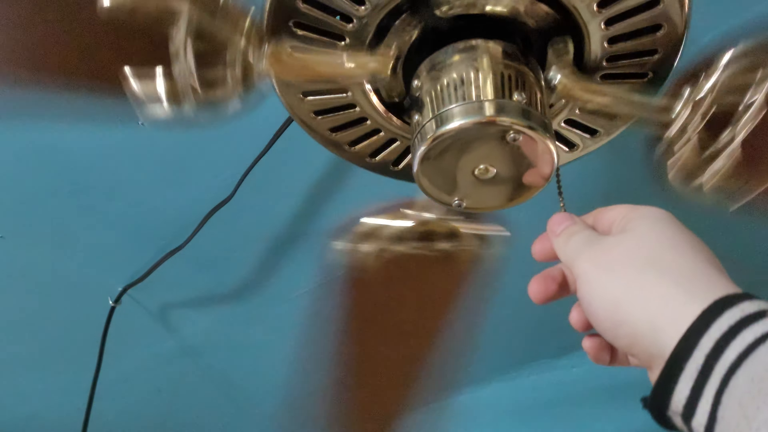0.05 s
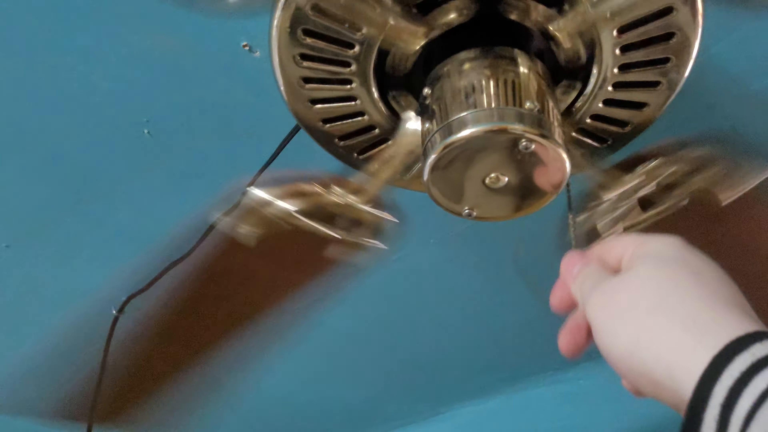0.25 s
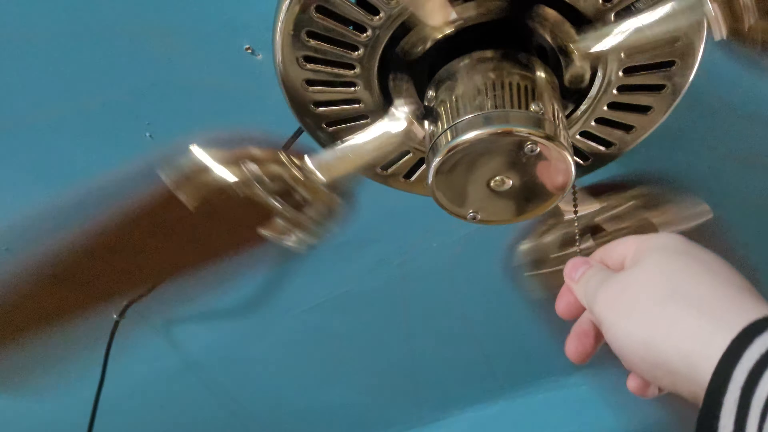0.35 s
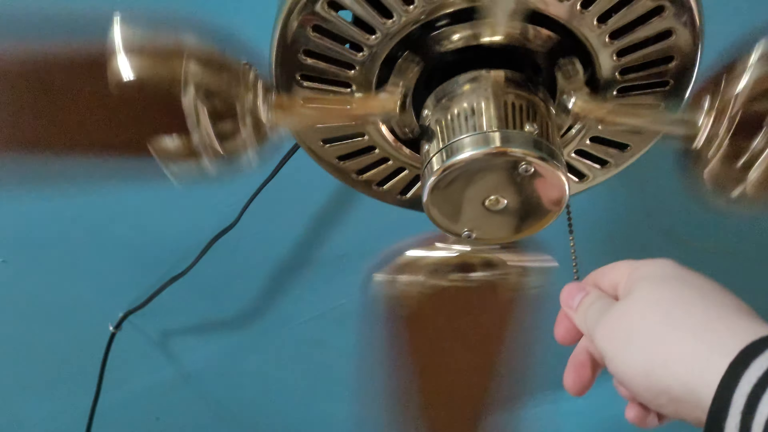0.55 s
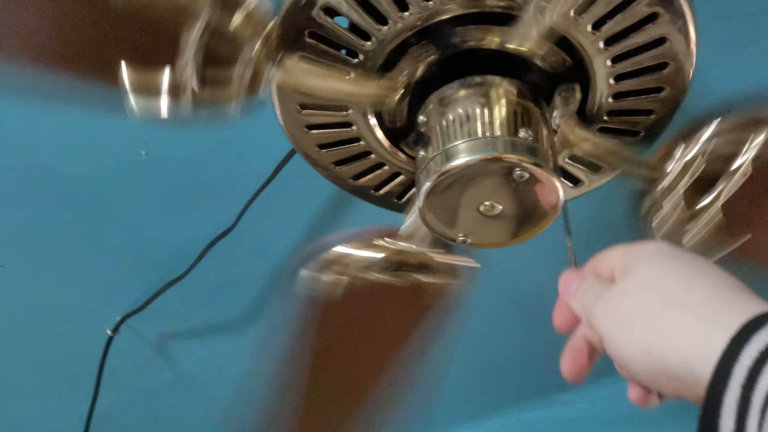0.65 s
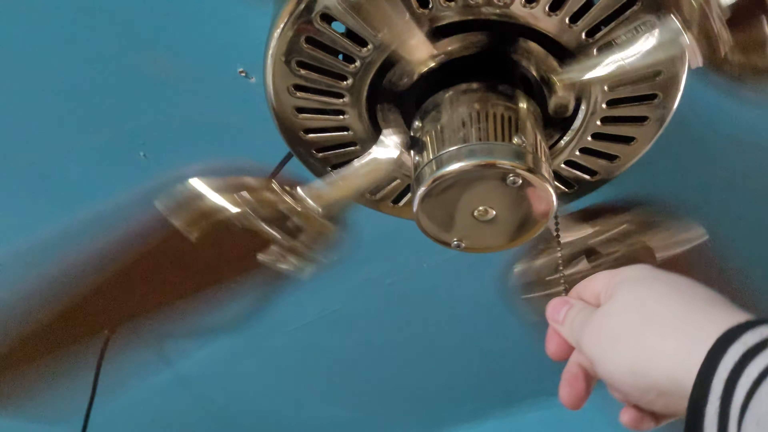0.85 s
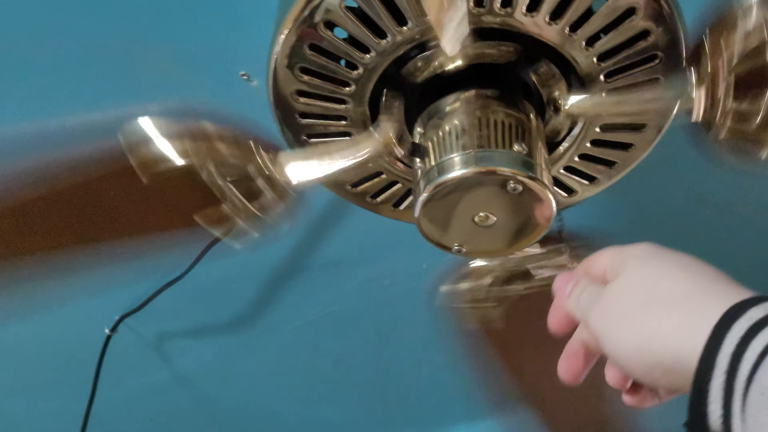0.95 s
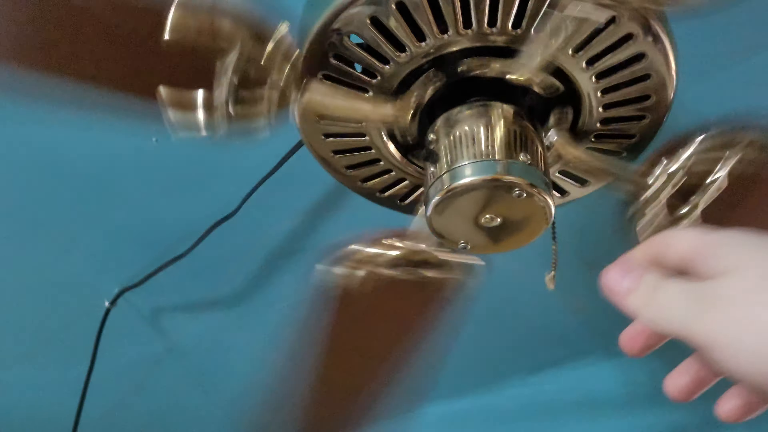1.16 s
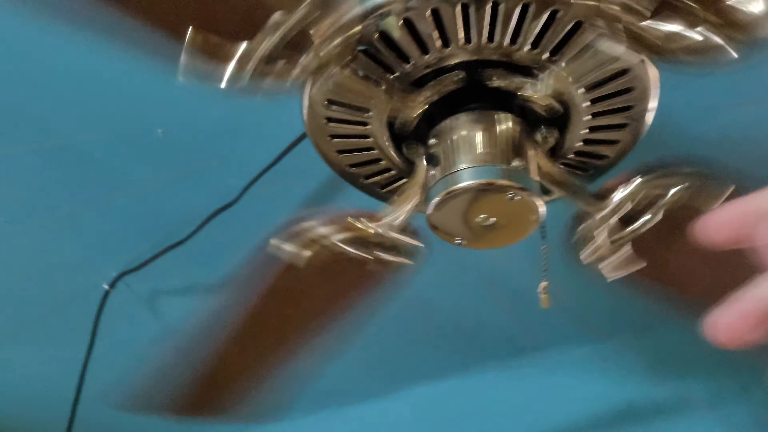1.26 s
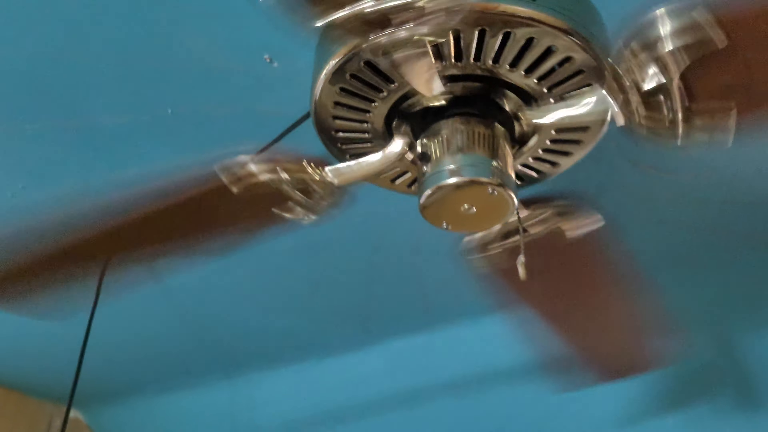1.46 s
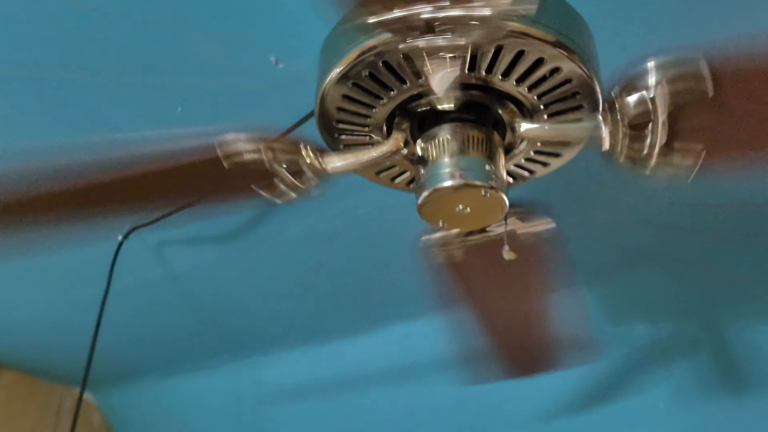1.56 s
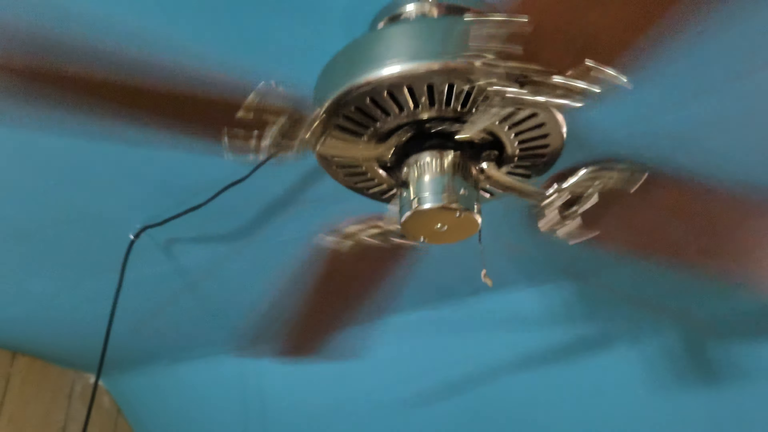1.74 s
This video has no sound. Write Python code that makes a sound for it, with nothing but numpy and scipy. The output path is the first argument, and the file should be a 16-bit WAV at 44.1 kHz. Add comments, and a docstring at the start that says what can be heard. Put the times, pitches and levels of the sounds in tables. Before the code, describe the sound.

A ceiling fan's bead chain is tugged six times quickly, each a sharp metallic click with a tiny rattle. Then the draught briefly buffets the close microphone, over a faint air hum in a small room.

```python
"""A ceiling fan runs in a small room: air hums faintly and the draught buffets a close microphone.
From 0.25 s to 1 s a hand tugs the bead chain six times. On each tug a few beads tick over the rim of
the switch housing, then the switch snaps, the chain rattles and the housing rings in its normal modes.
Near 1.2 s the draught peaks and single eddies strike the microphone. At 1.5 s the hand leaves the
chain with a soft rub, and a faint whirr grows until the end."""
import sys
import numpy as np
from scipy import signal
from scipy.fft import rfft, irfft
from scipy.io import wavfile
from scipy.ndimage import uniform_filter1d

SR = 44100
rng = np.random.default_rng(int(sys.argv[2]) if len(sys.argv) > 2 else 0)


def to_wav(sig):
    """Store sig (one row per channel, or 1-D mono) as 16-bit WAV at the path in sys.argv[1].

    Samples outside -1..1 are clipped; the rate is SR.
    """
    pcm = np.clip(np.atleast_2d(sig), -1, 1) * 32767
    pcm = np.round(pcm).astype(np.int16)
    wavfile.write(sys.argv[1], SR, pcm.T)  # frames by channels


N = 79380
T = np.arange(N) / SR
FREQS = np.fft.rfftfreq(N, 1 / SR)
CONTACT_RISE_S = 0.00075

# Snaps of the switch: t/s, level/dB, treble/dB, left-right/dB, housing ring/dB, low modes/dB,
# rattle/dB, rattle decay/s
SWITCH_SNAPS = [(0.319,-9,3,3.5,3.5,3.5,0,0.0091),(.4780,-1,-27,-0.5,1.5,-9,3,0.0036),(.5850,-5,1.5,-0.5,4,2.5,4.5,0.016),
                (0.737,-3.5,-3,-2,-2,2,2,0.026),(0.851,-3,-8,2.5,3.5,3,3.5,0.015),(1.0139,-3.5,-14,-0.5,3,-5.5,1.5,0.015)]


def pull_switch():
    """Superposition: the direct sound of switch and chain adds to the echoes of ticks and snaps."""
    ticks, snaps = bead_ticks(), switch_snaps()
    reflections = room(undb(-0.5) * ticks + undb(-4.5) * snaps)
    return ticks + snaps + rattle() + clinks() + housing() + reflections


def switch_snaps():
    """Impulsive excitation: the switch snaps over, and so brief a force has a broad spectrum."""
    spectrum = [(150, -35), (250, -15), (651, -22.5), (748, -21.5), (1200, -6), (1550, -24), (1950, -5.5),
                (2440, -16.5), (3120, -9), (6250, -18.5), (7840, -11.5), (9660, -23.5), (16000, -14)]  # f/Hz, level/dB
    return undb(-16.5) * impacts(SWITCH_SNAPS, spectrum, decay_s=0.0028, likeness=0.47)


def bead_ticks():
    """Impact sound: beads strike the rim of the housing one by one."""
    strikes = [(.2535,-19,-6.5,6),(.2885,-7,-13,5.5),(.3072,2,-13,-1),(.4342,-3,-9.5,-0.5),(.4560,-1.5,-8,-4),(.4728,-3.5,-1.5,3),
               (.5497,-9,-9,4),(.5668,-0.5,-17,1),(.5772,3.5,-6.5,-0.5),(.7008,-2,-12,-4.5),(.7200,-1,-4.5,4),(.7347,0,-3,-4),
               (.8228,-2,-9,1.5),(.8350,-3.5,-9,5),(.8428,4.5,-3.5,1),(.8560,-1,-10,-2),(.9770,-1,-9.5,-5.5),(.9960,2.5,-7,0.5),(1.0110,-3,3.5,-4.5)]  # t/s, level/dB, treble/dB, left-right/dB
    spectrum = [(400,0),(800,-1.5),(1200,0),(2000,-4.5),(3000,-8),(4400,-7),(5500,-7.5),(6300,-12.5),(7100,-1.5),(8600,-15),(10200,-14.5),(12000,-9.5),(14400,8.5),(16000,-2)]  # f/Hz, level/dB
    return undb(-24.5) * impacts(strikes, spectrum, decay_s=0.0035, likeness=0.13)


def impacts(strikes, spectrum, decay_s, likeness):
    """Transients of metal contact: the bright crack peaks first, the lower body just after."""
    body_hz, treble_hz = 1426, 10240
    body = split(noise(0.93), body_hz)[0]
    bright = split(noise(likeness), body_hz)[1]
    mid, treble = split(bright, treble_hz)
    out = 0
    for start, db, treble_db, pan_db, *_ in strikes:
        crack = (mid + undb(treble_db) * treble) * burst(start, CONTACT_RISE_S, decay_s)
        knock = body * burst(start, 0.0014, decay_s)
        out = out + undb(db) * pan(pan_db) * (crack + knock)
    return colour(out, spectrum)


def housing():
    """Free vibration: each snap rings the damped normal modes of the housing, never twice alike."""
    normal_modes = [(145.4,-7.5,0.25),(305.8,1,0.2),(385.6,-10.5,0.4),(476,-3.5,0.13),(628.3,-0.5,0.12),(854,-8.5,0.15),(1048,-3,0.091),(1133,-4,0.092),(1202,-1.5,0.095),
                    (1936,-8.5,0.2),(2116,-29,0.181),(2950,-12,0.21),(4540,4.5,0.029),(5770,0.5,0.027)]  # f/Hz, level/dB, T60/s
    hz, db, t60 = np.array(normal_modes).T[:, :, None]
    low_modes_hz, rise_s = 350, 0.0027
    age = T[:SR // 3]
    envelope = np.minimum(age / rise_s, 1) * np.exp(-np.log(1000) * age / t60)
    out = np.zeros(N)
    for start, snap_db, _, _, ring_db, low_db, *_ in SWITCH_SNAPS:
        scatter_db, phase, detune = rng.standard_normal((3, len(normal_modes), 1))
        amplitude = undb(db + scatter_db + low_db * (hz < low_modes_hz))
        modes = amplitude * np.sin(2 * np.pi * (hz * (1 + 0.0047 * detune) * age + phase))
        i = int(start * SR)
        out[i:i + len(age)] += undb(-35 + snap_db + ring_db) * (modes * envelope).sum(0)
    return out


def clinks():
    """Damped oscillators: each clink, set off by a snap or a bead strike, is one short-lived mode."""
    modes = [(.3072,5470,-16),(0.321,5520,-4.5),(0.479,2273,-2),(0.738,4470,-2.5),(0.739,5490,0),(1.0143,3000,-3),(1.0147,7810,-2.5)]  # t/s, f/Hz, level/dB
    t60_s = 0.022
    phases = rng.random((len(modes), 2, 1))
    out = 0
    for (start, hz, db), phase in zip(modes, phases):
        envelope = burst(start, CONTACT_RISE_S, t60_s / np.log(1000))
        out = out + undb(db - 21) * np.sin(2 * np.pi * (hz * T + phase)) * envelope
    return out


def rattle():
    """Shot noise of colliding beads: the chain slips just before each snap and shakes on after it."""
    spectrum = [(250,6),(700,-0.5),(1200,8),(2800,2),(4600,3.5),(6200,-22),(7600,-19),(10000,-30),(15000,-7)]  # f/Hz, level/dB
    contacts_per_s, spread_db, lead_s = 2400, 2.5, 0.006
    contacts = (rng.random(N) < contacts_per_s / SR) * undb(spread_db * rng.exponential(size=N))
    grit = unit(uniform_filter1d(contacts, size=24)) * diffuse()
    shake = sum(undb(db) * burst(start - lead_s, 2 * lead_s, decay)
                for start, *_, db, decay in SWITCH_SNAPS)
    return undb(-37.5) * colour(grit * shake, spectrum)


def room(x):
    """Reverberation: convolution with the dense reflections of a small room, whose treble dies first."""
    decay_times = [(250,0.3),(1000,0.35),(4000,0.29),(8000,0.21),(14000,0.14)]  # f/Hz, T60/s
    rest = diffuse()
    response = 0
    for hz, t60 in decay_times:
        band, rest = split(rest, hz * np.sqrt(2))
        fade = burst(start=0.0008, attack=0.00098, decay=t60 / np.log(1000))
        response = response + band * fade / np.sqrt(np.sum(fade ** 2))
    return signal.fftconvolve(x, response, axes=1)[:, :N]


def rubs():
    """Friction noise: the hand shifts and leaves the chain; a hollow resonance follows each rub."""
    strokes = [(.925,-38.5,0.015,0.025,-6),(0.955,-46,0.01,0.058,-3.5),(1.509,-54,0.0097,0.058,3),(1.528,-47.5,0.004,0.054,2.5)]  # t/s, level/dB, attack/s, decay/s, resonance/dB
    spectrum = [(150,3),(300,6),(700,-3.5),(1500,-8.5),(4000,-17.5),(7000,-24),(10000,-38.5),(16000,-47)]  # f/Hz, level/dB
    lag_s = 0.0067
    swell = hollow = 0
    for start, db, attack, decay, hollow_db in strokes:
        swell = swell + undb(db) * burst(start, attack, decay)
        hollow = hollow + undb(db + hollow_db) * burst(start, attack + lag_s, decay)
    return colour(diffuse(), spectrum) * swell + resonance(hz=293, width_hz=57) * hollow


def draught():
    """Turbulent pressure: gusts from the blades rumble on the microphone ports, mostly the right one."""
    course = [(0,-45.5,-17),(.08,-58.5,15),(0.199,-40,6.5),(0.292,-35.5,-23),(.35,-38,9),(.4,-39.5,-23),(.48,-46.5,-14.5),(.54,-58.5,3),(.595,-35,-3.5),(.67,-46.5,5),
              (.77,-37,5),(.87,-35,6),(.94,-49,8),(1.12,-42,-11.5),(1.236,-27,-2.5),(1.31,-37.5,-14),(1.431,-36.5,-23),(1.505,-50,-21),(1.578,-43,-29),(1.68,-57,-24),(1.8,-56,4)]  # t/s, level/dB, left-right/dB
    spectrum = [(15,-15.5),(30,-12.5),(52,6.5),(75,1),(120,-7.5),(200,-28),(400,-33),(800,-64.5),(2000,-75)]  # f/Hz, level/dB
    times, db, pan_db = np.array(course).T
    gust_db = unit(split(rng.standard_normal(N), hz=7.8)[0])
    rumble = unit(colour(noise(likeness=0.28) * undb(gust_db), spectrum))
    return rumble * undb(np.interp(T, times, db)) * pan(np.interp(T, times, pan_db))


def eddies():
    """Low pressure in a vortex core: each passing eddy is a smooth dip with a swell on either side."""
    passages = [(1.162,-28,78),(1.204,-25.5,56),(1.263,-29,69.4),(1.342,-31.5,95),(1.461,-38,105)]  # t/s, level/dB, centre f/Hz
    out = 0
    for centre, db, hz in passages:
        offset_squared = (np.pi * hz * (T - centre)) ** 2
        out = out + undb(db) * (2 * offset_squared - 1) * np.exp(-offset_squared)
    return out * pan(-14.5)


def air():
    """Broadband flow noise: moving air hums faintly, and its hiss swells a little."""
    course = [(0,-59.5,2),(.25,-57.5,-1.5),(1.15,-57,7.5),(1.4,-57,9),(1.52,-58.5,8.5),(1.8,-56.5,5)]  # t/s, level/dB, treble/dB
    spectrum = [(120, -33), (200, -9), (240, -1), (548, -15), (623, -14), (1320, -30.5), (2050, -31.5),
                (2860, -40), (5130, -45), (6400, -38.5), (16000, -56.5)]  # f/Hz, level/dB
    times, db, treble_db = np.array(course).T
    hum, hiss = split(colour(diffuse(), spectrum), hz=3020)
    return (hum + hiss * undb(np.interp(T, times, treble_db))) * undb(np.interp(T, times, db))


def motor():
    """Narrow-band noise of the running fan: two faint low hums and a whirr that grows slowly."""
    hums = [(154,23,-65),(235.6,10.2,-69.5)]  # f/Hz, width/Hz, level/dB
    whirr_course = [(0,-85.5),(1.2,-80),(1.6,-74),(1.8,-66)]  # t/s, level/dB
    times, whirr_db = np.array(whirr_course).T
    hum = sum(undb(db) * resonance(hz, width_hz) for hz, width_hz, db in hums)
    return hum + undb(np.interp(T, times, whirr_db)) * resonance(hz=2160, width_hz=530)


def resonance(hz, width_hz):
    """Resonance: diffuse noise confined to a band about one frequency, rms 1."""
    return unit(irfft(rfft(diffuse()) / (1 + 2j * (FREQS - hz) / width_hz) ** 2, N))


def diffuse():
    """Diffuse field: long waves are alike in both channels, short waves unrelated."""
    crossover_hz = 878
    return split(noise(0.72), crossover_hz)[0] + split(noise(0), crossover_hz)[1]


def noise(likeness):
    """Partial coherence: stereo white noise whose channels share this fraction of their power."""
    draw = rng.standard_normal((3, N))
    return np.sqrt(likeness) * draw[0] + np.sqrt(1 - likeness) * draw[1:]


def colour(x, spectrum):
    """Minimum-phase filter of unit power with the given spectrum, falling away below its first point."""
    roll_off = 1 + (spectrum[0][0] / 2 / np.maximum(FREQS, 1)) ** 2
    gain = undb(along(spectrum, FREQS)) / roll_off
    cepstrum = irfft(np.log(unit(gain)), N)
    cepstrum[1:N // 2] *= 2  # folding onto positive time makes the filter causal
    cepstrum[N // 2 + 1:] = 0
    return irfft(rfft(x) * np.exp(rfft(cepstrum)), N)


def split(x, hz):
    """Complementary filters: the parts below and above a frequency."""
    low = irfft(rfft(x) / (1 + (FREQS / hz) ** 8), N)
    return low, x - low


def burst(start, attack, decay):
    """Exponential decay after a linear rise; times in seconds."""
    age = T - start
    return np.clip(age / attack, 0, 1) * np.exp(-np.maximum(age - attack, 0) / decay)


def along(points, hz):
    """Interpolation of (f/Hz, value) points on a logarithmic frequency axis."""
    f, values = np.array(points).T
    return np.interp(np.log(np.maximum(hz, 1)), np.log(f), values)


def pan(db):
    """Intensity stereo: left and right gains for a level difference."""
    return undb(np.array([[1], [-1]]) * db / 2)


def unit(x):
    """Normalisation to rms 1."""
    return x / np.sqrt(np.mean(x ** 2))


def undb(db):
    """Amplitude ratio of a level in decibels."""
    return 10 ** (np.asarray(db) / 20)


def scene():
    """Superposition: switch and hand, a little to the left, over the running fan and its moving air."""
    balance = [(300,-3),(600,0.5),(1100,3),(2200,7),(4500,4.5),(8000,-3.5),(14000,-5)]  # f/Hz, left-right/dB
    switch_and_hand = irfft(rfft(pull_switch() + rubs()) * pan(along(balance, FREQS)), N)
    return switch_and_hand + draught() + eddies() + air() + motor()


def record(dry):
    """Band limiting: a steep elliptic low-pass cuts the highest treble."""
    cutoff_hz = 16050
    return signal.sosfilt(signal.ellip(10, .2, 80, cutoff_hz, fs=SR, output="sos"), dry)


dry = scene()
out = record(dry)
to_wav(out)
```